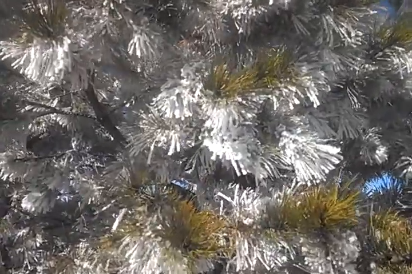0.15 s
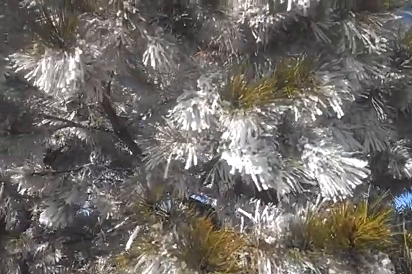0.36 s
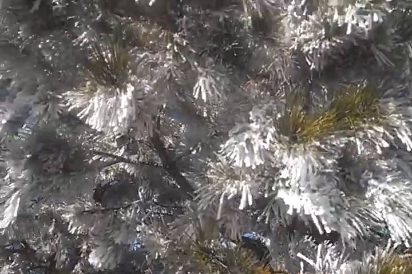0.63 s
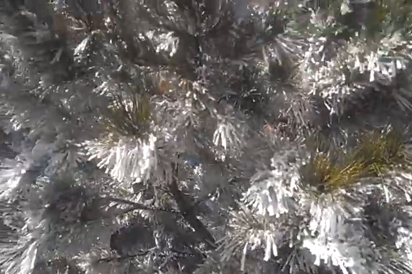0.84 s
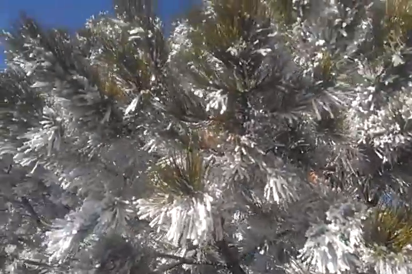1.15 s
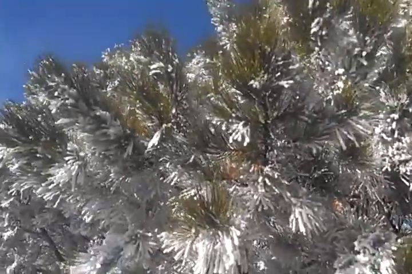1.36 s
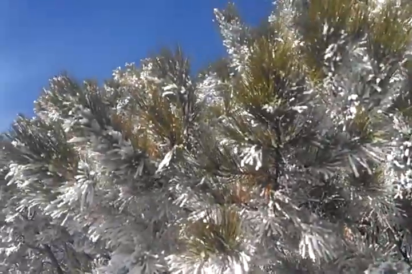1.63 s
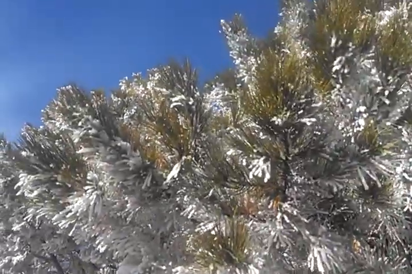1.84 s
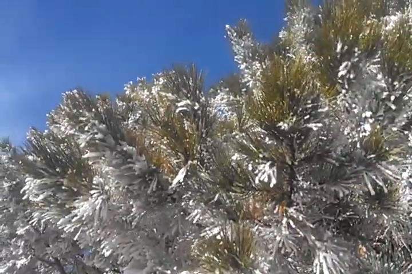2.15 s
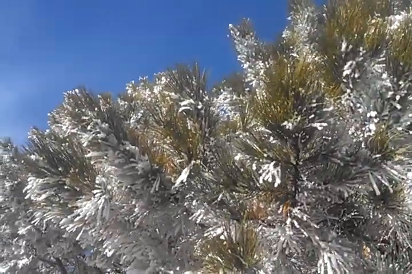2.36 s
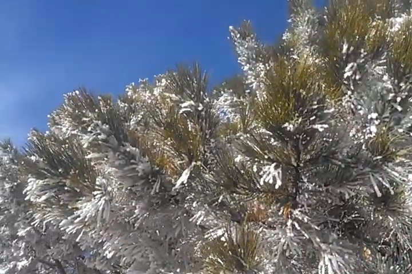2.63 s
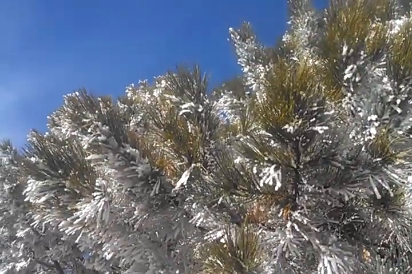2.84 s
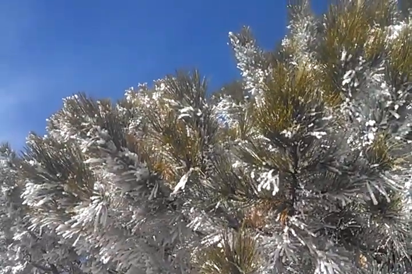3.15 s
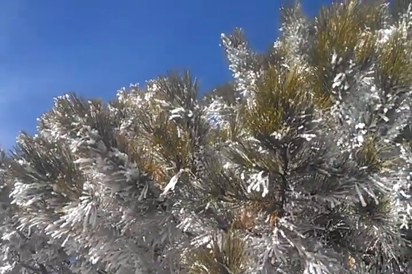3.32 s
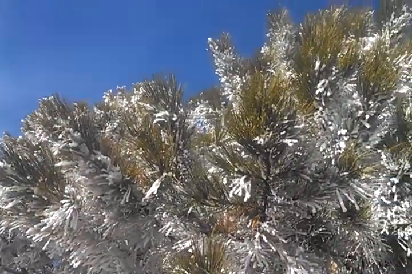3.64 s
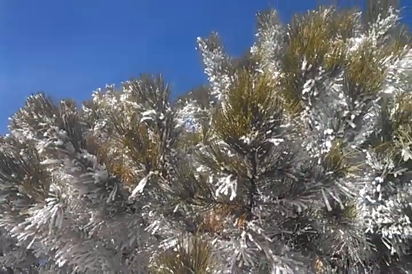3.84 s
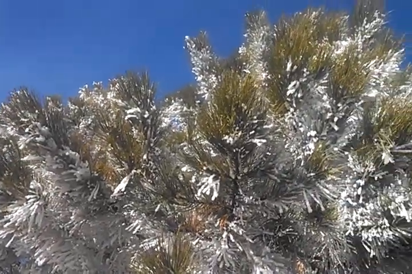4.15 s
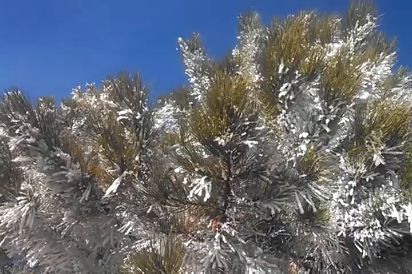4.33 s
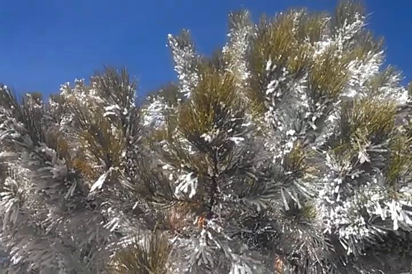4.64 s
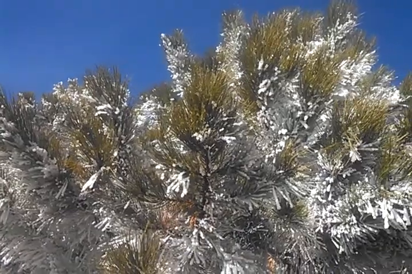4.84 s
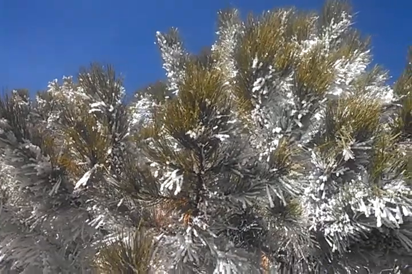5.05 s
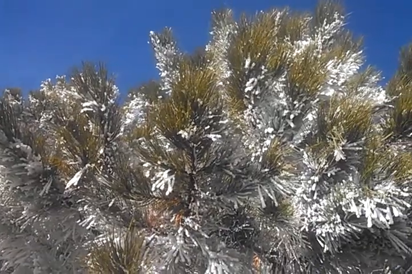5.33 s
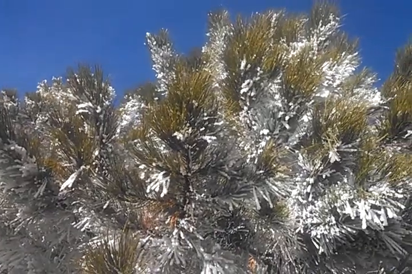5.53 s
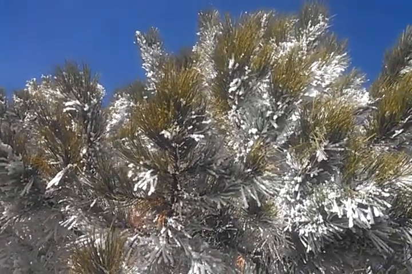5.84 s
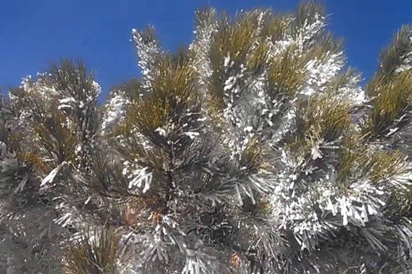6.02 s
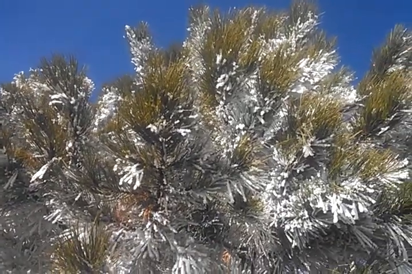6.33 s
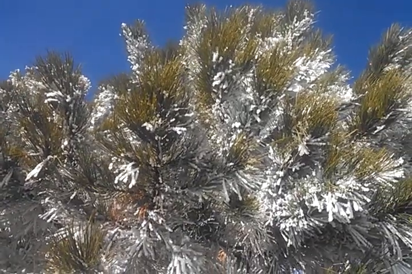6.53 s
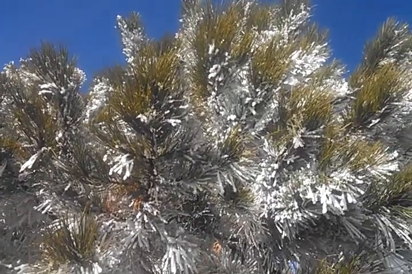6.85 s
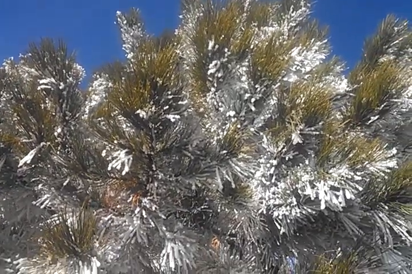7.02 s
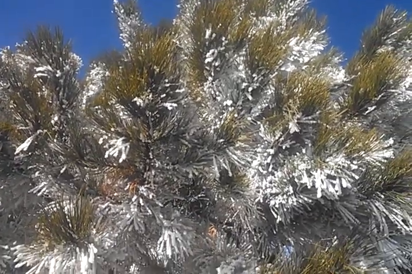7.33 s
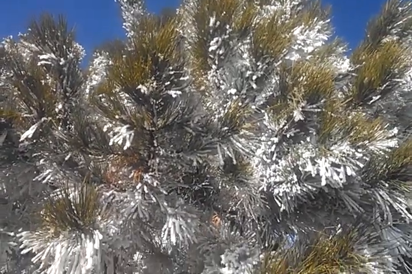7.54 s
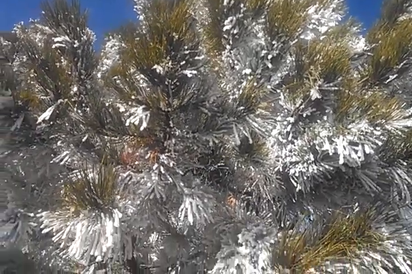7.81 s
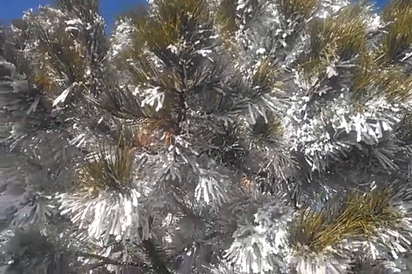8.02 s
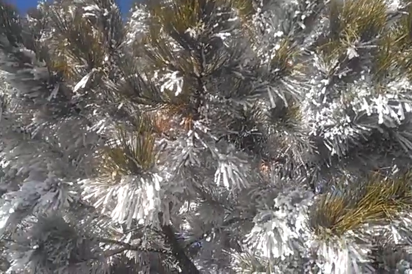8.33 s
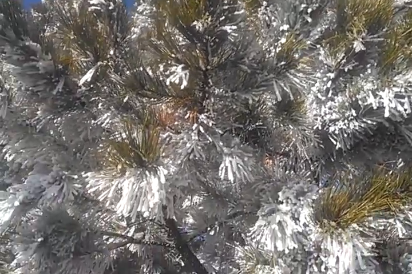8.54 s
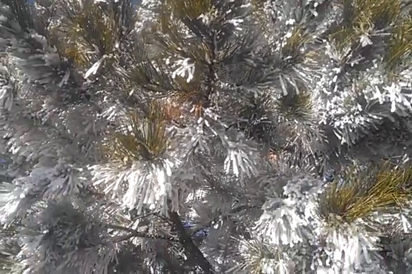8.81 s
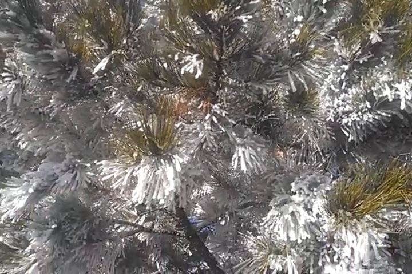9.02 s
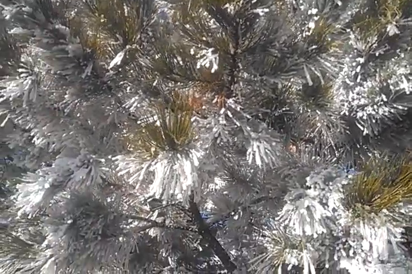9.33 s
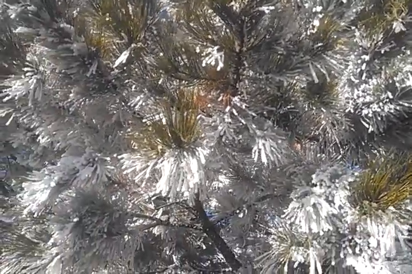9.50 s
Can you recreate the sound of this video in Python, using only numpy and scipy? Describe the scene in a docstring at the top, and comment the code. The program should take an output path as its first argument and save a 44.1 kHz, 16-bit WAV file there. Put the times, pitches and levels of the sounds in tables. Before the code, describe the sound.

Quiet outdoor air under thawing pines carries a faint hush and soft, low puffs of breeze on the microphone. Tiny ice crystals tick throughout, and small clumps of ice land with soft crunches, sometimes making a twig ring briefly. Light drops tap the microphone at about 0.8 and 1.3 seconds. At 1.8 seconds ice crunches down and a drop hits the microphone with a very loud, sharp snap; the background dips briefly and creeps back. A distant crow caws hoarsely four times between 2.5 and 4.3 seconds, echoing faintly, with a low bump on the microphone at 3.7 seconds. Smaller taps follow from about 4.3 to 5.6 seconds. A second loud drop strikes at 7 seconds. The crow calls very faintly near 6.9 and 9.5 seconds, while ticks and light falls of ice continue, with a small cluster just after 9 seconds.

```python
"""Thaw under mountain pines

Frost melts in still air. Meltwater drops tap on and beside the camera, clumps of ice fall through the
needles and crunch on the ground, struck twigs ring briefly and tiny crystals tick all around.
Far off, a crow caws four times, later twice more faintly, and the trees carry the echo.
The hardest drop ducks the camera's gain, which creeps back up."""
import sys
import numpy as np
from scipy import signal
from scipy.fft import rfft, irfft, next_fast_len
from scipy.io import wavfile
from scipy.ndimage import uniform_filter1d, minimum_filter1d, map_coordinates

SR = 44100
rng = np.random.default_rng(int(sys.argv[2]) if len(sys.argv) > 2 else 0)


def log_audio(samples):
    """Write samples as a 16-bit WAV file to the path given in sys.argv[1]."""
    # one column per channel
    frames = np.atleast_2d(samples).T
    # limit to full scale, then quantise
    limited = np.clip(frames, -1, 1)
    pcm = np.round(limited * 32767).astype(np.int16)
    wavfile.write(sys.argv[1], SR, pcm)


N = 426447

# Spectra of the mountain air and of the breeze on the microphone: frequency_hz, relative_db
HUSH_SPECTRUM = [(20, -15), (35, -16), (70, -61), (170, 4), (350, 1), (700, -10.5), (1500, -14),
                 (2400, -18.5), (4000, -22), (9000, -29), (12000, -25), (15000, -28.5)]
BREEZE_SPECTRUM = [(15, -34), (28, -22), (45, -6), (68, 0), (105, -8), (200, -19), (600, -70)]
# Puffs of air on the microphone: crest_s, level_db, half_width_s
BREEZE_PUFFS = [(.28, -44.5, 0.28), (.56, -42.5, 0.077), (1.435, -37.5, 0.055), (2.8, -50, 0.16),
                (3.31, -40, 0.051), (3.724, -28, 0.02), (3.93, -39, 0.26), (4.9, -45, 0.024),
                (8.2, -48.5, 1), (9.62, -35, 0.049)]
# Reverberation among the pines: frequency_hz, t60_s
FOREST_DECAY = [(200, 0.68), (1500, 0.48), (10000, 0.82)]
# The far crow's calls: start_s, length_s, attack_s, top_pitch_hz, relative_db, jitter_share
CROW_CAWS = [(2.535, .19, .05, 560, -55, .06), (3.3, .3, .05, 565, -54.5, .08),
             (3.725, .21, .015, 592, -50.5, .035), (4.172, .14, .02, 598, -51.5, .042),
             (6.85, .3, .08, 535, -64, .08), (9.53, .2, .05, 540, -60, .08)]
# Resonance of its throat: frequency_hz, relative_db
THROAT_SPECTRUM = [(600, -44), (1000, -23), (1200, -11), (1380, 0), (1780, 0), (2000, -11), (2600, -28),
                   (5000, -46)]
# The nearest ice crystals: start_s, tap_db, crackle_db, sizzle_db, t60_s
NEAR_TICKS = [(0.2056, -58.0, -56.0, -44.5, 0.011), (0.242, -55.5, -56.5, -57.0, 0.005),
              (0.2761, -66.0, -62.5, -57.0, 0.005), (0.3305, -58.0, -61.0, -54.0, 0.005),
              (0.384, -66.0, -66.0, -57.5, 0.005), (0.7286, -66.0, -66.0, -57.0, 0.014),
              (0.8678, -66.0, -58.5, -54.0, 0.009), (1.0002, -66.0, -52.5, -46.5, 0.008),
              (1.0249, -66.0, -56.0, -50.5, 0.016), (1.0432, -66.0, -60.0, -53.0, 0.005),
              (1.0793, -66.0, -62.5, -56.5, 0.005), (1.2856, -58.0, -49.0, -39.0, 0.008),
              (1.3246, -55.5, -58.5, -52.0, 0.009), (2.4577, -58.5, -53.5, -54.0, 0.008),
              (2.533, -66.0, -66.0, -57.5, 0.009), (2.7767, -59.0, -66.0, -55.5, 0.009),
              (3.1321, -59.0, -54.5, -51.0, 0.011), (3.7895, -61.5, -56.5, -56.0, 0.007),
              (3.8629, -51.0, -55.0, -66.0, 0.01), (3.9192, -61.5, -61.5, -56.5, 0.007),
              (3.9882, -66.0, -50.5, -50.5, 0.045), (4.0028, -58.5, -54.0, -55.5, 0.016),
              (4.1503, -66.0, -56.0, -53.0, 0.016), (4.2711, -58.0, -52.5, -49.0, 0.008),
              (4.5348, -57.0, -60.0, -54.5, 0.016), (4.7495, -60.0, -56.0, -55.0, 0.006),
              (4.7674, -66.0, -57.0, -56.5, 0.008), (4.9525, -66.0, -55.5, -57.0, 0.008),
              (5.0606, -65.0, -59.0, -57.5, 0.016), (5.1351, -58.5, -60.0, -57.5, 0.005),
              (5.1788, -58.0, -51.0, -48.5, 0.01), (5.2323, -62.0, -59.5, -56.5, 0.016),
              (5.4581, -66.0, -66.0, -56.5, 0.016), (5.4786, -57.0, -57.5, -52.5, 0.013),
              (5.5403, -66.0, -56.5, -54.0, 0.016), (5.7114, -64.5, -57.0, -46.0, 0.005),
              (6.1112, -66.0, -53.0, -53.5, 0.016), (6.3656, -57.0, -55.0, -56.0, 0.008),
              (7.2164, -58.0, -50.5, -53.5, 0.008), (7.4048, -58.0, -57.5, -51.0, 0.005),
              (7.4484, -66.0, -53.0, -53.5, 0.016), (7.6618, -64.5, -49.5, -56.5, 0.014),
              (7.7577, -66.0, -62.0, -58.0, 0.013), (7.853, -66.0, -57.0, -52.0, 0.01),
              (7.9577, -53.5, -53.5, -45.5, 0.012), (8.0766, -59.5, -63.0, -55.0, 0.005),
              (8.2813, -47.0, -50.5, -50.0, 0.045), (8.6352, -52.5, -54.5, -47.5, 0.012),
              (8.9045, -66.0, -50.0, -47.0, 0.045), (8.9298, -66.0, -60.0, -56.0, 0.016),
              (9.3045, -66.0, -66.0, -57.0, 0.005), (9.3276, -66.0, -60.0, -56.5, 0.016),
              (9.62, -55.5, -58.5, -54.5, 0.011)]
# Spectra of a near tick's three parts: frequency_hz, relative_db
TAP_SPECTRUM = [(200, 21), (600, 17), (1500, 4), (4000, 1), (7000, -28), (14000, -29)]
CRACKLE_SPECTRUM = [(2000, -5), (4000, -0.5), (7000, 3.5), (10000, 3.5), (12000, -6), (15000, -27)]
SIZZLE_SPECTRUM = [(7000, -46), (10500, -12.5), (12500, 1), (15000, 7.5), (16000, -23)]
# Spectrum of the faint ticks and of a drop's spray: frequency_hz, relative_db
SPARKLE_SPECTRUM = [(1800, -23), (3500, -5.5), (7500, 5), (10000, -6), (12500, 5), (15000, 12.5),
                    (16500, -26)]
# Twigs and icicles struck by falling ice, and the short rings of some drops on the camera: start_s, pitch_hz,
# level_db, t60_s
STRUCK_NOTES = [(.289, 486, -54, .4), (1.286, 388, -30, 0.042), (1.287, 1050, -28.5, 0.019),
                (1.7516, 1059, -36, 0.28), (2.024, 1280, -57, 0.36), (2.728, 1210, -58, 0.39),
                (4.476, 1067, -49.5, 0.15), (4.477, 1233, -52.5, 0.23), (4.477, 4230, -50.5, 0.1),
                (4.918, 1810, -45, 0.023), (5.641, 440, -33.5, .025), (5.796, 440, -43, 0.33),
                (5.796, 1666, -56, 0.26), (6.037, 1210, -52.5, 0.26), (7.353, 420, -50, 0.28),
                (7.353, 3688, -63, 0.16), (8.28, 3920, -52.5, 0.2), (8.62, 1165, -59, .23),
                (9.045, 620, -55, 0.27), (9.045, 903, -47.5, 0.2), (9.045, 1604, -49.5, 0.27),
                (9.045, 3470, -47.5, 0.085), (9.219, 420, -44.5, 0.24), (9.219, 863, -53, 0.32),
                (9.219, 3820, -60, .09)]
# Clumps of ice landing: start_s, crunch_db, spray_db, t60_s
ICE_CLUMPS = [(.185, -53, -68, 1), (.289, -56.5, -75, 0.66), (0.468, -54, -58, 0.16), (.549, -56.5, -84, 1),
              (.763, -55, -75, 1), (1.399, -51.5, -73, 0.073), (1.75, -27, -44, 0.17),
              (1.827, -47, -51, 0.098), (2.024, -52, -58.5, 0.4), (2.73, -52, -59.5, 0.47),
              (2.831, -49.5, -56, 0.24), (4.477, -52, -46, 0.13), (5.795, -51, -68, 0.45),
              (6.037, -49.5, -58, 0.23), (7.106, -55.5, -59.5, 0.53), (7.353, -47.5, -53.5, 0.19),
              (8.28, -59.5, -67, 0.34), (8.62, -55, -59, 0.19), (9.044, -45, -49.5, 0.14),
              (9.219, -49.5, -56, 0.22)]
# Spectra of a landing's three parts: frequency_hz, relative_db
THUD_SPECTRUM = [(60, -31), (180, -0.5), (330, 13.5), (550, 3.5), (900, -23), (2000, -49)]
CRUNCH_SPECTRUM = [(300, -45), (650, 12), (1000, 10.5), (1650, 9), (2300, 3), (3500, -3.5), (8000, -35)]
SPRAY_SPECTRUM = [(1200, -50), (2600, -0.5), (3800, -1.5), (5000, -10), (7000, -10), (10000, -20),
                  (14500, -11), (16000, -33)]
# Drops and soft bumps on the camera, and a few sharp crystal ticks played the same way: start_s, slap_db,
# slap_hz, shell_db, thump_db, snap_db, snap_hz
CAMERA_DROPS = [(0.8184, -38, 1200, -53, -60, -55, 4030), (0.838, -29, 890, -48, -50, -56, 4000),
                (1.2862, -26.5, 945, -42, -47, -46, 5640), (1.727, -36, 3300, -58, -60, -30, 4000),
                (1.7642, -.5, 850, -19, -28, 7.5, 3650), (3.2816, -27.5, 197, -58, -44, -60, 4000),
                (3.293, -33, 286, -52, -42, -60, 4000), (3.7138, -16, 72, -62, -60, -55, 4000),
                (4.27, -37, 1100, -48, -52, -47, 6800), (4.919, -34, 2220, -61, -60, -31, 3700),
                (5.179, -35, 1230, -47, -48, -35, 5900), (5.6418, -40, 420, -50, -54, -45, 4000),
                (6.964, -6.5, 1080, -13.5, -13, -9.5, 4300), (7.2165, -31.5, 3370, -54, -60, -33, 4100),
                (9.422, -39, 1990, -60, -60, -42, 4000)]
# Dull thump of the camera body: pitch_hz, relative_db, t60_s
BODY_MODES = [(270, 0, .02)]
# Time constant of the shell's falling pitch at each microphone port: left_s, right_s
SHELL_GLIDE = [.0031, .0019]
# Stereo widening, the left channel's phase behind the right: frequency_hz, lag_half_turns
LEFT_PHASE_LAG = [(0, 1), (200, .92), (400, .75), (780, .12), (1400, 0), (1700, .12), (2450, .78),
                  (3100, 1.22), (3500, 1.95), (4700, 1.95), (5200, 1.25), (6700, .1), (7200, -.1),
                  (8700, -1.3), (9300, -1.95), (10200, -2.05), (10600, -2.75), (11450, -3.25),
                  (12100, -3.95), (12700, -3.95), (13400, -3.25), (14200, -2.7), (14900, -2)]
# Channel balance, left row then right: gain_db
CHANNEL_BALANCE = [
    [-.8],
    [.8],
]


def amp(db):
    """Decibels to gain."""
    return 10 ** (np.asarray(db) / 20)


def unit(x):
    """Scale to rms 1."""
    return x / np.sqrt(np.mean(x ** 2) + 1e-20)


def along(points, hz):
    """Read (frequency_hz, value) points on a log frequency axis."""
    point_hz, values = np.transpose(points)
    return np.interp(np.log(hz + 1), np.log(point_hz + 1), values)


def wobble(rate, size):
    """A smooth random curve with rate knots a second."""
    knots = rng.standard_normal(int(size * rate / SR) + 4)
    return map_coordinates(knots, [np.arange(size) * rate / SR])


def filtered(x, response):
    """Pass x through a response given as a function of frequency."""
    size = x.shape[-1]
    padded = next_fast_len(size + 4096)
    return irfft(rfft(x, padded) * response(np.fft.rfftfreq(padded, 1 / SR)), padded)[..., :size]


def coloured(x, spectrum):
    """Shape x by a spectrum and scale it to rms 1."""
    return unit(filtered(x, lambda hz: amp(along(spectrum, hz))))


def add(track, start_s, sound):
    """Mix a sound in from start_s."""
    part = track[max(round(start_s * SR), 0):][:len(sound)]
    part += sound[:len(part)]


def click(spectrum, t60):
    """A tiny noise burst with the energy of 3 ms at rms 1."""
    t = np.arange(SR // 25) / SR
    burst = coloured(rng.standard_normal(len(t)), spectrum) * amp(-60 * t / t60)
    return burst / np.sqrt(np.sum(burst ** 2) / (.003 * SR))


def air(hush_db=-54, breeze_db=-49, flutter_db=2):
    """A faint steady hush, and a fluttering breeze on the microphone that swells in soft low puffs."""
    t = np.arange(N) / SR
    hush = amp(hush_db + .89 * wobble(9.6, N)) * coloured(rng.standard_normal(N), HUSH_SPECTRUM)
    puffs = (amp(db) * np.exp(-((t - crest_s) / width_s) ** 2) for crest_s, db, width_s in BREEZE_PUFFS)
    strength = np.sqrt(amp(breeze_db) ** 2 + sum(puff ** 2 for puff in puffs))
    flutter = amp(flutter_db * wobble(7.2, N))
    return hush + strength * flutter * coloured(rng.standard_normal(N), BREEZE_SPECTRUM)


def forest(x):
    """The trees scatter a sound into a diffuse tail."""
    hz, t, bands = signal.stft(rng.standard_normal(SR), SR, nperseg=256)
    decay = amp(-60 * t / along(FOREST_DECAY, hz)[:, None])
    _, tail = signal.istft(bands * decay, SR, nperseg=256)
    return signal.fftconvolve(x, tail / np.linalg.norm(tail))[:N]


def with_slope_echo(x, delay_s=.28, echo_db=-1, cutoff_hz=1550):
    """A sound plus its late, dulled return from a far slope."""
    out = x.copy()
    add(out, delay_s, amp(echo_db) * filtered(x, lambda hz: 1 / (1 + (hz / cutoff_hz) ** 10)))
    return out


def crow(crest_share=.33, droop_share=.25, fade_db=1.5):
    """Far, hoarse caws: a rasping pitch rises quickly and sinks slowly through one throat resonance."""
    out = np.zeros(N)
    for start_s, length_s, attack_s, top_hz, db, jitter in CROW_CAWS:
        size = round(length_s * SR)
        progress = np.linspace(0, 1, size)
        skewed = progress ** (np.log(.5) / np.log(crest_share))  # reaches one half at the top pitch
        arch = np.abs(np.sin(np.pi * skewed)) ** 1.5
        pitch = top_hz * (1 - droop_share * (1 - arch)) * (1 + jitter * wobble(600, size))
        rasp = amp(3.2 * wobble(420, size))
        phase = 2 * np.pi * np.cumsum(pitch) / SR
        voice = sum(np.sin(k * phase) / k ** 2 for k in range(1, 6)) * rasp
        swell = np.minimum(progress * length_s / attack_s, 1) * signal.windows.tukey(size, .15)
        add(out, start_s, amp(db - fade_db * progress) * coloured(voice, THROAT_SPECTRUM) * swell)
    return out


def varied(spectrum, spread_db=3):
    """Nudge each point of a spectrum at random, so that no two crystals sound alike."""
    return [(hz, db + spread_db * rng.standard_normal()) for hz, db in spectrum]


def crystals(bite_db=2.5, tap_t60=.011, faint_db=-70, faint_t60=.011, faint_count=600, flurry_db=2):
    """Crystals tap, crackle and sizzle close to the microphone, among flurries of fainter ticks."""
    out = np.zeros(N)
    for start_s, tap_db, crackle_db, sizzle_db, t60 in NEAR_TICKS:
        tap = amp(tap_db) * click(TAP_SPECTRUM, tap_t60)
        crackle = amp(crackle_db) * click(varied(CRACKLE_SPECTRUM), t60)
        sizzle = amp(sizzle_db) * click(varied(SIZZLE_SPECTRUM), t60)
        add(out, start_s, amp(bite_db) * (tap + crackle) + sizzle)
    thaw = np.cumsum(amp(flurry_db * wobble(9, N)))  # ticks crowd where this climbs fastest
    for thaw_share, faintness in rng.random((faint_count, 2)):
        start_s = np.searchsorted(thaw, thaw_share * thaw[-1]) / SR
        level_db = faint_db - 3.4 * np.log(max(faintness, .05))
        add(out, start_s, amp(level_db) * click(varied(SPARKLE_SPECTRUM), faint_t60))
    return out


def struck_notes(rattle_db=3, wander_share=.045, attack_s=.002):
    """A struck twig, icicle or the camera's shell rings with a short, slightly rattling note."""
    out, t = np.zeros(N), np.arange(SR // 2) / SR
    for start_s, hz, db, t60 in STRUCK_NOTES:
        pitch = hz * (1 + wander_share * wobble(400, len(t)))
        rattle = amp(rattle_db * wobble(185, len(t)))
        tone = unit(np.sin(2 * np.pi * np.cumsum(pitch) / SR) * rattle)
        add(out, start_s, tone * np.minimum(t / attack_s, 1) * amp(db - 60 * t / t60))
    return out


def clumps(grain_db=2, grain_rate=700, thud_boost_db=2, rise_share=.0044):
    """Ice thuds, crunches and sprays on the ground; many small fractures make the decay grainy."""
    out, t = np.zeros(N), np.arange(SR // 2) / SR
    for start_s, crunch_db, spray_db, t60 in ICE_CLUMPS:
        grains = amp(grain_db * wobble(grain_rate, len(t)))
        thud, crunch, spray = (coloured(grains * rng.standard_normal(len(t)), spectrum)
                               for spectrum in (THUD_SPECTRUM, CRUNCH_SPECTRUM, SPRAY_SPECTRUM))
        landing = amp(crunch_db) * (amp(thud_boost_db) * thud + crunch) + amp(spray_db) * spray
        rise_s = rise_share * t60  # a loose clump that settles slowly also gathers slowly
        envelope = np.minimum(t / rise_s, 1) * amp(-60 * np.maximum(t - rise_s, 0) / t60)
        add(out, start_s, landing * envelope)
    return out


def drops(ring_start_hz=2900, ring_end_hz=150, ring_s=.0062, snap_t60=.0016, spray_db=-34):
    """Drops slap and snap at both microphone ports; the camera thumps and its shell rings downward."""
    out, t = np.zeros((2, N)), np.arange(SR // 10) / SR
    lead_s = .01  # the slap's push comes just ahead of the impact, its pull just after
    ring_envelope = (1 - np.exp(-t / .0007)) * np.exp(-(t / ring_s) ** 2)
    thump = sum(np.sin(2 * np.pi * hz * t) * amp(db - 60 * t / t60) for hz, db, t60 in BODY_MODES)
    for start_s, slap_db, slap_hz, shell_db, thump_db, snap_db, snap_hz in CAMERA_DROPS:
        slap_phase = 2 * np.pi * slap_hz * (t - lead_s)
        slap = -slap_phase * np.exp((1 - slap_phase ** 2) / 2)
        snap = np.sin(2 * np.pi * snap_hz * t) * amp(snap_db - 60 * t / snap_t60)
        spray = amp(snap_db + spray_db) * click(SPARKLE_SPECTRUM, t60=.0099)
        for port, glide_s in zip(out, SHELL_GLIDE):
            # high bending waves arrive first, and spread more on the way to the farther port
            pitch = ring_end_hz + (ring_start_hz - ring_end_hz) * np.exp(-t / glide_s)
            ring = -ring_envelope * np.sin(2 * np.pi * np.cumsum(pitch) / SR)
            add(port, start_s - lead_s, amp(slap_db) * slap)
            add(port, start_s, amp(shell_db) * ring + amp(thump_db) * thump + snap)
            add(port, start_s, spray)
    return out


def scene(crow_db=-3, crow_reverb_db=-5, ice_reverb_db=-10, side_air_db=-20, hiss_db=-88):
    """Both microphone ports hear nearly the same sound; the camera's widening spreads it by phase."""
    caws = crow()
    ice = clumps() + struck_notes() + crystals()
    far_crow = amp(crow_db) * caws + amp(crow_reverb_db) * forest(with_slope_echo(caws))
    side_air = amp(side_air_db) * air() * np.array([[1], [-1]])  # air that differs from port to port
    left, right = drops() + ice + amp(ice_reverb_db) * forest(ice) + far_crow + air() + side_air
    lag_hz, half_turns = np.transpose(LEFT_PHASE_LAG)
    left = filtered(left, lambda hz: np.exp(-1j * np.pi * np.interp(hz, lag_hz, half_turns)))
    hiss = amp(hiss_db) * rng.standard_normal((2, N))  # each channel's own noise
    return amp(CHANNEL_BALANCE) * np.array([left, right]) + hiss


def record(dry, ceiling_db=-2.5, recovery_db_per_s=10, top_hz=15700):
    """The camera's gain ducks at once on an overload and recovers slowly; the top treble is cut off."""
    peak_db = 20 * np.log10(np.abs(dry).max(axis=0) + 1e-9)
    over_db = np.maximum(peak_db - ceiling_db, 0)
    recovery_db = recovery_db_per_s * np.arange(N) / SR
    duck_db = np.maximum.accumulate(over_db + recovery_db) - recovery_db
    gain_db = uniform_filter1d(minimum_filter1d(-duck_db, size=55), size=55)  # rounds off the attack
    return filtered(dry * amp(gain_db), lambda hz: hz < top_hz)


dry = scene()
out = record(dry)
log_audio(out)
```